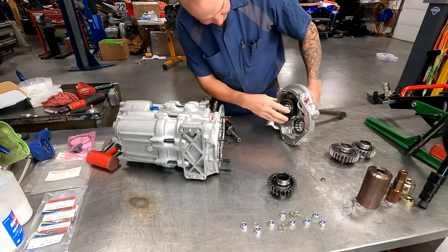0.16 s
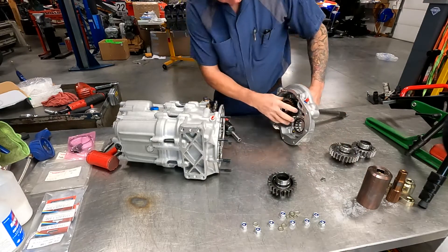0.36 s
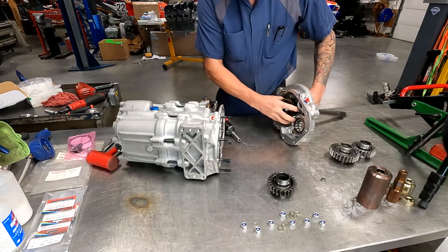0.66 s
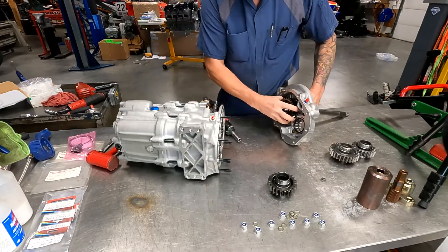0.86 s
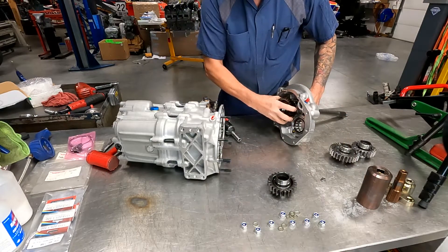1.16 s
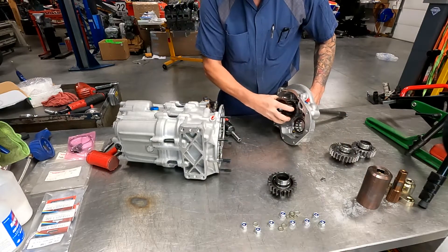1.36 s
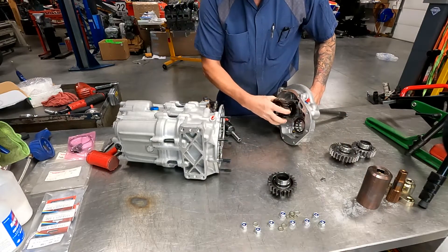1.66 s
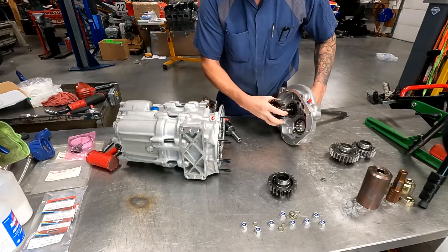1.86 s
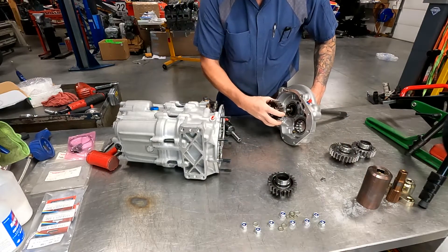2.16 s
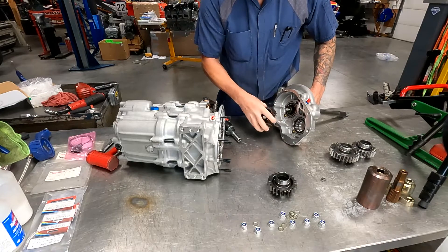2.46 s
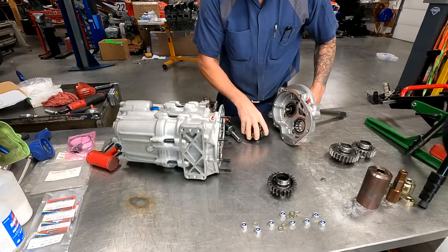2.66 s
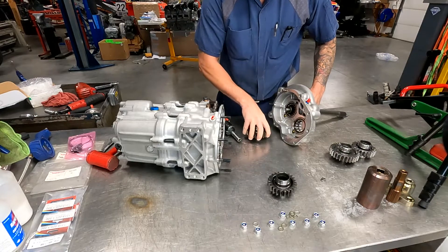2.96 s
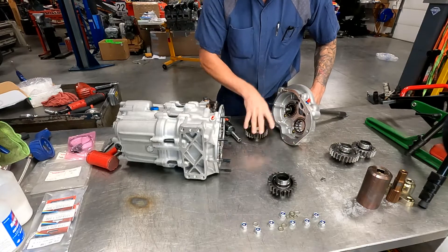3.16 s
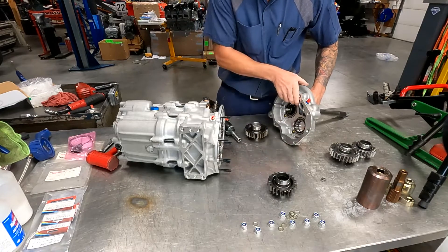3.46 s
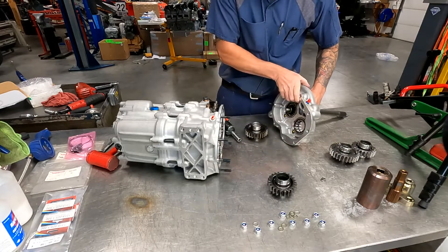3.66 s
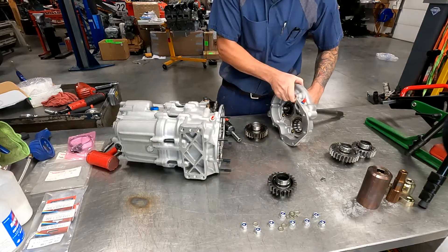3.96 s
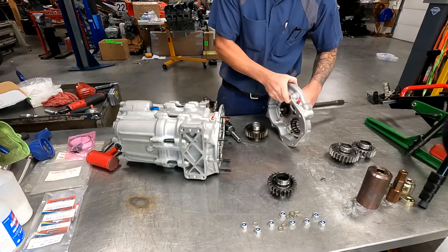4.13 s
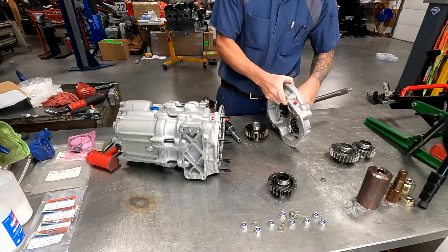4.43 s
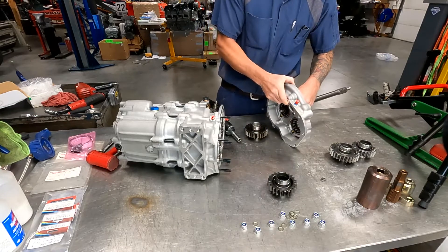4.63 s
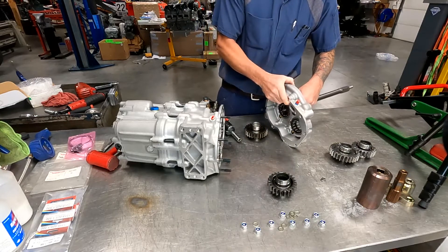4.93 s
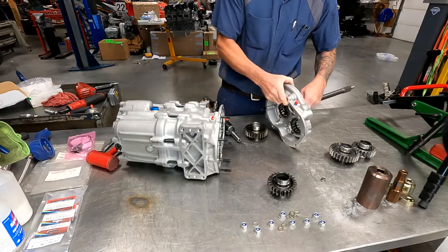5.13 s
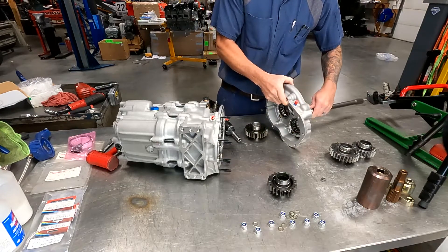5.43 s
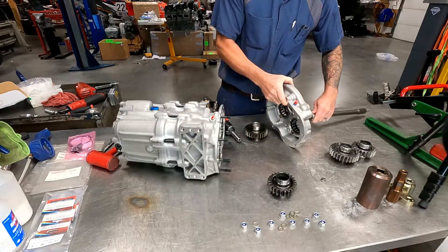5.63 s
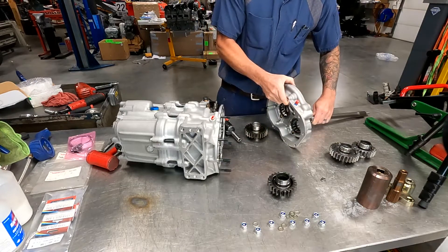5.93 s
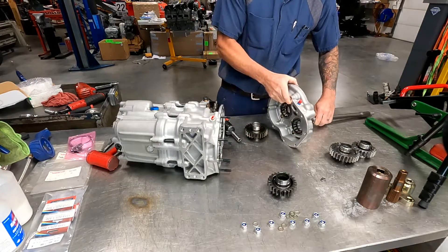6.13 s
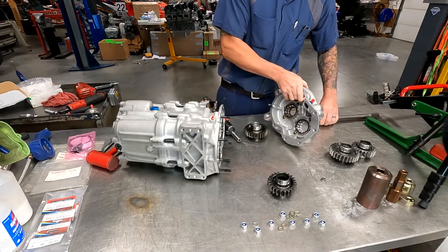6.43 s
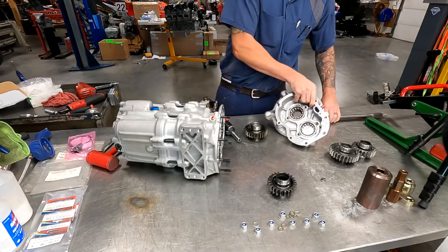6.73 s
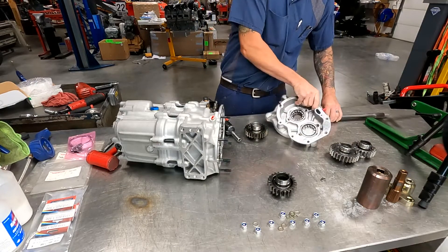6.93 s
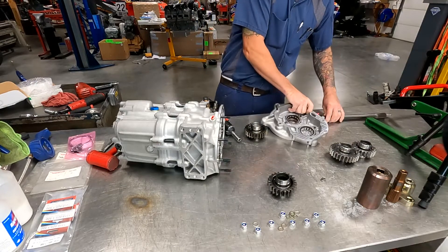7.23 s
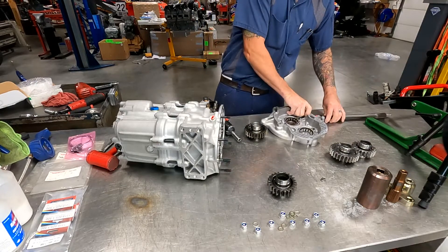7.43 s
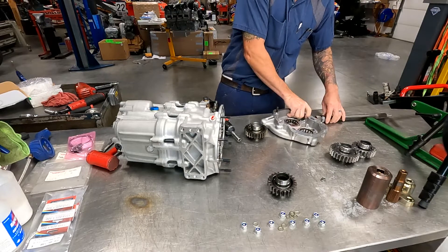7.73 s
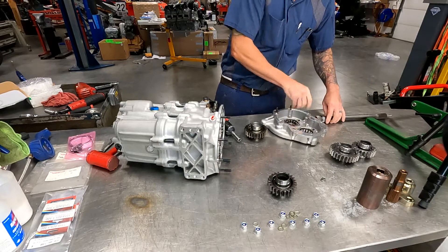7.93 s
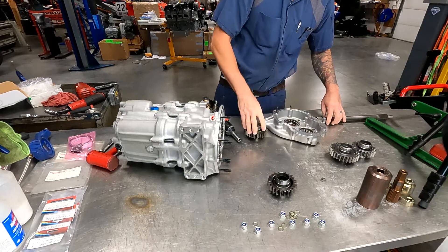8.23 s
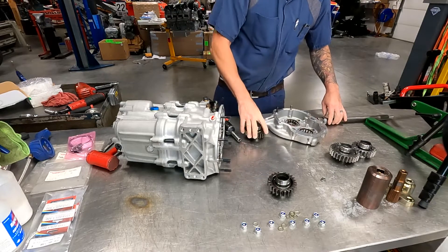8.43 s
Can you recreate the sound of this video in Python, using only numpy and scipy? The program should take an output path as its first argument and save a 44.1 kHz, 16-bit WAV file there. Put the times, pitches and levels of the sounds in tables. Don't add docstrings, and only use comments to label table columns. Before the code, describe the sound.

Quiet garage with low hum, floor rumble and faint hiss, heard close to a sheet steel bench and nearly mono. A soft low knock opens at 0 s, a tiny click at 0.7, then faint dry rubbing of a gear turned in its seat until about 2.4. At 2.8 the gear lands with a loud, bright clank and deep bench thud, falling flat at 3.08. Muted knocks and a short rub follow around 4.0, 4.4 and 4.9, with a tiny squeak near 4.8. At 5.93 the heavy housing knocks hard; a gritty drag grows from 6.1 to a double bang at 6.55. It clatters over at 6.84-6.96, scrapes, knocks at 7.57 and lands loudly at 7.8. A thin high shaft tone rings after 6.87 and from 7.6 almost to the end, over dull rocking, soft ticks and a last low knock at 8.52.

```python
import sys
import numpy as np
from scipy import signal
from scipy.io import wavfile
from scipy.ndimage import uniform_filter1d

SR = 44100
rng = np.random.default_rng(int(sys.argv[2]) if len(sys.argv) > 2 else 0)


def store_wav(level_fs):
    pcm = np.round(np.clip(np.atleast_2d(level_fs), -1, 1) * 32767)
    wavfile.write(sys.argv[1], SR, pcm.T.astype(np.int16))


def convert_level_to_amplitude(level_db):
    exponent = np.asarray(level_db, float) / 20
    return 10 ** exponent


N = 378819
TIME = np.arange(N) / SR
EDGES = 45 * 2 ** (np.arange(27) / 3)
CENTRES = np.sqrt(EDGES[1:] * EDGES[:-1])

# f/Hz, level/dB per Hz
AIR = [(24, -31), (40, -4), (140, -15.5), (195, -21), (244, -20.5), (284, -29), (356, -24), (403, -28),
       (481, -26), (650, -29.5), (2170, -34.5), (3870, -32.5), (6240, -39.5), (15000, -42), (16200, -53.5)]
AIR_DB = -68
# f/Hz, level/dB
HUM = [(120, -81.5), (240, -76), (360, -82)]
# t/s, level/dB
SWAY = [(0, -46), (0.5, -44), (1.1, -40.5), (1.6, -54.5), (2.0, -43), (3.2, -52.5), (4.1, -49), (5.3, -49),
        (6.25, -60), (7.1, -47.5), (8.59, -56)]
# t/s, level/dB
SHAKES = [(0.05, -54), (1.75, -59), (2.87, -48), (3.25, -57.5), (3.9, -55), (4.2, -55), (4.62, -55),
          (5.001, -56), (6.031, -49.5), (6.27, -55.5), (6.6, -40.5), (6.89, -41), (7.12, -50), (7.4, -58),
          (7.61, -50), (7.87, -37), (8.15, -48), (8.45, -46.5)]
FLOOR_DB, SHAKE_RISE_S, SHAKE_FALL_S = -62.5, 0.11, 0.19
# f/Hz, level/dB per Hz
SIDE_HISS = [(120, -58), (200, -29), (254, -3.5), (353, 0.5), (482, -2), (11300, -4), (13300, -12),
             (16000, -11.5)]
SIDE_DB = -87
SIDE_SLOPE_DB = -31

# f/Hz, level/dB, t60/s
BENCH = [(105.4, -8, 0.5), (150, -6.5, .4), (200.9, -8, .4), (253, -19.5, 0.35), (311.4, -11, 0.249),
         (478, -21, 0.17), (546, -11.5, 0.18), (584, -10.5, 0.085), (651.5, -30, .2)]
# f/Hz, level/dB, t60/s
GEAR = [(1027, -2, 0.23), (1474, -8.5, 0.43), (2028, -3.5, 0.2), (2410, -4.5, 0.22), (2987, -2.5, 0.22),
        (3170, -4, 0.31), (3580, 5, 0.41), (3810, -3.5, 0.37), (4600, -6.5, 0.28), (4880, -7, 0.18),
        (4740, -13.5, 0.71), (5250, -10.5, 0.28), (6300, -12, 0.21), (6172, -9, 0.22), (6590, -10, 0.15),
        (6600, -10.5, 0.18), (6780, -17.5, 0.21), (7200, -14.5, 0.2), (7400, -16.5, 0.19),
        (7757, -10.5, 0.16)]
# f/Hz, level/dB, t60/s
HOUSING = [(334, 4, 0.65), (408, 1, 1.0), (589, 6, 0.76), (1050, 6, 5.0), (1237, 2, 0.42), (1630, -4, 0.48),
           (1890, -35, 5.0), (2040, -17, 5.0), (2405, 4.5, 0.13), (3550, 9, 0.2), (3910, 2.5, 0.22),
           (4030, -3, 0.035), (3850, -12, 0.061), (4800, -24, 5.0), (5717, -22, 0.72), (6270, 4, 0.025)]
GEAR_UNTIL_S = 3.5

# t/s, 1-4 kHz peak level/dB, weight/dB, edge/dB (both relative), sheet t60/s
KNOCKS = [(0.0014, -58, 13, -18, 0.34), (0.6806, -68, -6, -4, 0.16), (2.802, -14, -8, -10, 0.31),
          (3.05, -41.5, -7, -15, 0.12), (3.0778, -24.5, -1, -14.5, 0.37), (3.979, -43.5, -23, -22, 0.34),
          (4.0583, -41, 5.5, -25.5, 0.37), (4.3806, -35.5, 3, -25.5, 0.37), (4.8891, -60.5, 16, -17, 0.66),
          (5.9319, -21, -9, -16.5, 0.38), (6.5493, -22.5, -8.5, -15, 0.17), (6.5775, -27, -3, -22, 0.33),
          (6.8356, -20, -7.5, -21.5, 0.3), (7.5559, -29.5, -3, -54, 0.12),
          (7.7982, -22.5, -5.5, -14.5, 0.48), (8.52, -37.5, 8.5, -21.5, 0.21)]
# t/s, peak level/dB, weight/dB, sheet t60/s
BOUNCES = [(6.8476, -32, -6, 0.14), (6.891, -24.5, -10, 0.27), (6.9558, -24, -12, 0.36),
           (7.1147, -43, -10, 0.15), (7.18, -58, 3, 0.38), (7.5772, -25, -11, 0.2), (7.6031, -33, -3, 0.5),
           (7.829, -20, -17, 0.26), (7.8385, -18, -15.5, 0.26), (7.857, -24, -4.5, 0.2),
           (7.91, -38, -13, 0.19)]
BOUNCE_EDGE_DB = -19.5
# t/s, peak level/dB
TICKS = [
    (8.064, -43),
    (8.1166, -43),
    (8.15, -46),
    (8.2217, -41),
    (8.2734, -44.5),
    (8.382, -47),
    (8.429, -46),
]
TICK_WEIGHT_DB, TICK_EDGE_DB, TICK_T60_S = -0.5, -28, 0.29
HITS = sorted([*KNOCKS,
               *[(s, db, weight, BOUNCE_EDGE_DB, t60) for s, db, weight, t60 in BOUNCES],
               *[(s, db, TICK_WEIGHT_DB, TICK_EDGE_DB, TICK_T60_S) for s, db in TICKS]])
COLOUR_HZ = np.log([130, 450, 2000, 9000])
KNOCK_DB, KNOCK_PER_WEIGHT = -5.0, 0.54

# t/s, peak level/dB, f/Hz, t60/s
SINGLE_MODES = [(2.8, -32, 92.6, 0.36), (2.801, -12, 139, 0.075), (3.077, -21.5, 194.5, 0.27),
                (4.057, -42, 178, 0.51), (4.378, -35.5, 186, 0.37), (5.931, -26, 151, 0.34),
                (6.551, -32.5, 182.5, 0.34), (6.575, -33, 152, 0.42), (6.835, -31, 177, 0.65),
                (6.895, -32, 179.5, 0.25), (6.956, -33, 257.6, 0.33), (7.577, -38, 181, 0.19),
                (7.793, -23.5, 129, 0.11), (7.842, -25, 149.4, 0.3), (7.869, -39, 163, 0.16),
                (8.521, -30.5, 185.5, 0.2),
                (0.001, -39, 322, 0.2), (0.681, -58, 4250, 0.034), (0.681, -56, 5150, 0.032),
          (1.271, -65, 1960, 0.37), (1.09, -66, 1774, 0.6), (8.429, -54, 1290, 0.4),
          (2.802, -20.5, 519, 0.13), (2.803, -23.5, 199.3, 0.36), (3.048, -47, 1050, 0.1),
          (3.08, -30.5, 391, 0.17), (3.085, -41, 3650, 0.29), (3.101, -33.5, 208.2, 0.74),
          (4.89, -46, 191.2, 0.4), (8.069, -44.5, 305.5, 0.43), (8.07, -51, 1265, 0.1),
          (8.276, -51, 1300, 0.12), (8.526, -43, 150, .1), (7.601, -53, 1610, 0.2), (4.39, -43, 160, 0.77),
          (5.94, -37, 150, 0.79), (6.837, -28, 806, 0.074), (6.96, -42.5, 154.7, 1.1),
          (7.556, -26.5, 1274, 0.031), (7.83, -24, 302.5, 0.23), (7.83, -31.5, 1284, 0.18),
          (7.83, -37, 3840, 0.26), (8.555, -53, 2000, 0.24), (8.543, -55, 3900, .2),
          (8.516, -62, 13300, .03), (8.524, -63, 13700, .03), (8.543, -63, 10500, .03),
          (8.553, -62, 11000, .03), (8.56, -64, 10300, .04), (8.545, -66, 14000, .03),
          (8.454, -63, 14300, .02), (7.64, -63, 8300, .25), (4.815, -70, 3150, .1), (3.96, -60, 2060, .2),
          (3.97, -60, 3880, .2), (3.079, -36, 150, .4), (7.802, -36, 3800, .15), (6.838, -34, 640, .15),
          (6.55, -36, 1560, .08), (6.585, -42, 500, .3), (6.1, -50, 150, .4), (7.792, -40, 1200, .03),
          (7.577, -40, 2100, .06), (7.15, -52, 290, .3), (2.29, -62, 185, .3)]
# f/Hz, level/dB, t60/s
GEAR_DOWN = [(600, -6, .25), (1028, -13, .22), (1780, -9, .25), (1954, -12, .28), (2110, -13, .23),
             (2390, -14, .24), (2912, -11, .3), (3138, -9, .3), (3262, -9, .28), (3688, -11, .4),
             (4457, -15, .26), (4662, -11, .24), (5313, -8, .07), (6040, -15, .2)]
# f/Hz, level/dB, t60/s
GEAR_FLAT = [(468, -10, 1.1), (598, -1, 0.22), (1163, -12, 0.27), (1211, -10, 0.24), (1680, -12, 0.31),
             (1868, -6, 0.17), (3542, 0, 0.12), (3628, -14, 0.34), (3688, -10, 0.26), (3898, -7, 0.21),
             (4037, -14, 0.28), (4387, -14, 0.18)]
# f/Hz, level/dB, t60/s
HOUSING_TIPS = [(479, -2, 0.62), (1330, -2, 0.32), (1846, -5, 0.33), (2250, -12, 0.45), (3160, -7, 0.35),
                (3488, -6, 0.28), (3790, -3, 0.22), (3865, 0, 0.17), (4888, -10, 0.25), (6595, -22, 0.5)]
# f/Hz, level/dB, t60/s
HOUSING_STOPS = [(1739, -7, 0.33), (2487, -5, 0.19), (2929, -4, 0.2), (3300, -6, 0.25), (3391, 0, 0.19),
                 (4097, -3, 0.2), (4613, -26, 5.0), (5050, -5, 0.14), (5319, -10, 0.24), (5534, -27, 1.7)]
# f/Hz, level/dB, t60/s
HOUSING_TURNS = [(824, -3, .2), (1217, -8, .2), (1776, -2, .3), (2283, -6, .2), (2751, -9, .2),
                 (3268, 0, .25), (3542, -4, .2), (3849, -6, .3), (4064, -6, .2)]
# f/Hz, level/dB, t60/s
HOUSING_LIES = [(1884, 0, .3), (2342, -5, .35), (2805, -5, .3), (3262, -3, .3), (3596, -3, .3),
                (6175, -14, .4), (7364, -14, .3)]
# t/s, peak level/dB of the strongest mode, family of modes
LANDINGS = [
    (2.802, -23, GEAR_DOWN),
    (3.079, -38, GEAR_FLAT),
    (5.933, -42, HOUSING_TIPS),
    (6.55, -42, HOUSING_STOPS),
    (6.837, -42, HOUSING_TURNS),
    (6.892, -44, HOUSING_TURNS),
    (6.957, -44, HOUSING_TURNS),
    (7.8, -42, HOUSING_LIES),
    (7.839, -38, HOUSING_LIES),
]
LONGEST_RING_S = .45

# f/Hz, level/dB per Hz
SHEET = [(29, -38), (55, -10), (198, -5.5), (313, -9.5), (380, -11.5), (586, -13), (927, -18.5),
         (1050, -18.5), (1960, -18.5), (2750, -21), (3760, -16.5), (10400, -32), (16000, -44.5)]
# f/Hz, factor on t60
SHEET_T60 = [(60, 1.26), (200, 1.22), (600, 1.055), (2000, 1), (6000, 0.67), (14000, 0.7)]
# f/Hz, level/dB
CRACK = [(1000, 2), (5000, -63), (10000, 12), (16000, 11)]
# f/Hz, level/dB under the blow, t60/s
GARAGE = [(60, -24, 2.87), (396, -19, 0.61), (3240, -17, 0.8), (11730, -18.5, 0.64)]

# peak t/s, rise/s, fall/s, friction level/dB, dull level/dB relative to it
TURNS = [(0.95, .1, 0.39, -69.5, 4), (1.535, .03, .14, -69, -25), (2.0, 0.16, 0.13, -65, -1),
         (2.19, 0.064, 0.12, -68, -7), (2.285, 0.094, 0.13, -65, 2.5), (2.44, .03, .08, -74, -20),
         (1.91, .03, .08, -71, -5), (3.905, 0.055, .12, -62.5, 5), (3.975, 0.086, 0.072, -53, -12),
         (4.83, .09, .09, -79, -8), (4.905, 0.054, .1, -68.5, 5)]
NUDGES = [
    (1.13, 0.091, 0.083, -61, 1),
    (1.31, 0.089, .06, -68.5, 13),
    (5.755, .02, .12, -75, -17),
]
SLIDES = [
    (6.13, 0.089, 0.39, -50, -5),
    (6.28, 0.26, 0.17, -48, -4),
    (6.46, 0.092, 0.085, -44, -7),
    (6.53, 0.12, 0.033, -47.5, -7),
    (7.04, .05, 0.19, -53, 2),
    (7.2, .15, 0.32, -63.5, -2),
    (7.796, .005, .02, -42, -2),
]
ROCKS = [
    (7.99, .04, 0.13, -58, 4.8),
    (8.15, .008, 0.11, -53.5, 5),
    (8.32, .2, .2, -63.5, 9.4),
    (8.458, 0.0073, .08, -55, 2.8),
    (8.55, .05, .2, -54, 12.3),
]
TURN_BRIGHT_DB, NUDGE_BRIGHT_DB, SLIDE_BRIGHT_DB, ROCK_BRIGHT_DB = -12, -39, -11, -17
STROKE_FADE_DB = 16.5
# f/Hz, level/dB per Hz
RUB = [(59, -33), (100, -7.5), (215, -7.5), (315, -5), (415, -5), (502, -4), (1360, -8), (3320, -12),
       (14400, -23.5), (16000, -32)]
# f/Hz, width/Hz, level/dB
FINGERED = [(1100, 11, -2), (1597, 17, -6), (1900, 120, -6), (2980, 25.4, -15), (3500, 23, -2),
            (3806, 110, -0.5), (4390, 41, -8.5), (4560, 52, -29), (4720, 67, -12), (5150, 27, -18),
            (5900, 200, -5), (7600, 33, -28.5)]
# f/Hz, width/Hz, level/dB
RUBBED = [(500, 14, 2), (1050, 50, -2), (2170, 150, -10), (2550, 42, -8), (3020, 57, -12), (3470, 29, -4.5),
          (3880, 22, -3), (4620, 31, -13), (5430, 60, -13), (6100, 43, -15), (9850, 60, -17),
          (12300, 150, -15), (10900, 140, -14), (14500, 55, -18)]
SEAT_UNTIL_S, DRAG_UNTIL_S = 5.95, 6.6

# t/s, peak level/dB
SNAPS = [(2.802, -19), (3.0779, -32), (5.932, -28), (5.961, -46), (6.3326, -54), (6.4049, -54), (6.55, -38),
         (6.8444, -34), (6.892, -42), (6.9566, -48), (7.1094, -53), (7.1841, -58), (7.5772, -46),
         (7.615, -48), (7.7922, -40), (7.8, -36), (7.8385, -32), (8.1449, -59), (8.2102, -57),
         (8.4532, -56), (8.5435, -60)]
SNAP_DB, SNAP_T60_S, SNAP_FROM_HZ = -4.5, .03, 7000

# t/s, level/dB
SQUEAK = [
    [(4.79, -79), (4.82, -72), (4.865, -79)],
]
SQUEAK_HZ = 3790
# from t/s, until t/s, level/dB, t60/s
SHAFT = [
    (6.868, 6.958, -39, .38),
    (6.988, 7.022, -50, 0.4),
    (7.035, 7.052, -59, .4),
    (7.072, 7.11, -58, .4),
    (7.125, 7.47, -67, 1.2),
    (7.601, 7.795, -41, 1.05),
    (7.945, 8.53, -48.5, 1.7),
    (8.578, 8.62, -60, 1.5),
]
SHAFT_HZ = 4830


def rms_one(x):
    return x / np.sqrt(np.mean(x ** 2) + 1e-20)


def band_pass(x, edges, order):
    return signal.sosfilt(signal.butter(order, edges, "band", fs=SR, output="sos"), x)


def at_hz(points, hz, axis=1):
    points = np.array(points)
    return np.interp(np.log(hz), np.log(points[:, 0]), points[:, axis])


def bands():
    white = rng.standard_normal((2, N))
    return [band_pass(white[k % 2], EDGES[k:k + 2], 2) for k in range(len(CENTRES))]


def coloured(spectrum):
    return rms_one(sum(convert_level_to_amplitude(at_hz(spectrum, hz)) * band for hz, band in zip(CENTRES, bands())))


def fine(coarse):
    return np.interp(TIME, TIME[::64], coarse)


def swell(peak_s, rise, fall, level_db):
    late = TIME[::64] - np.asarray(peak_s)[:, None]
    span = np.where(late < 0, np.reshape(rise, (-1, 1)), np.reshape(fall, (-1, 1)))
    fade_db = np.minimum(STROKE_FADE_DB * (late / span) ** 2, 90)
    return convert_level_to_amplitude(np.asarray(level_db)[:, None] - fade_db) ** 2


def garage_air():
    s, shake_db = np.transpose(SHAKES)
    shake_power = swell(s, SHAKE_RISE_S, SHAKE_FALL_S, shake_db).sum(axis=0)
    shake_gain = fine(np.sqrt(shake_power + convert_level_to_amplitude(FLOOR_DB) ** 2))
    sway_gain = convert_level_to_amplitude(np.interp(TIME, *np.transpose(SWAY)))
    sway = rms_one(band_pass(rng.standard_normal(N + SR), [.7, 7], 4)[SR:])
    rumble = rms_one(band_pass(rng.standard_normal(N + SR), [20, 48], 4)[SR:])
    hum = sum(convert_level_to_amplitude(level_db) * np.sin(2 * np.pi * hz * TIME) for hz, level_db in HUM)
    return sway_gain * sway + shake_gain * rumble + hum + convert_level_to_amplitude(AIR_DB + 2.5) * coloured(AIR)


def thuds():
    out, after = np.zeros(N + SR), np.arange(SR) / SR
    woken = [(s, db + mode_db, hz, min(t60, LONGEST_RING_S))
             for s, db, family in LANDINGS for hz, mode_db, t60 in family]
    for s, level_db, hz, t60 in [*SINGLE_MODES, *woken]:
        late = after[:int(min(1.6 * t60, 1) * SR)]
        swing = convert_level_to_amplitude(level_db - 1 - 60 * late / t60) * (1 - np.exp(-late * hz * 2.7))
        out[int(s * SR):][:len(late)] += swing * np.sin(2 * np.pi * hz * late)
    return out[:N]


def ring(clicks, hz, t60):
    r, w = convert_level_to_amplitude(-60 / (t60 * SR)), 2 * np.pi * hz / SR
    return signal.lfilter([0, np.sin(w)], [1, -2 * r * np.cos(w), r * r], clicks + 1e-18)


def blow_db(hz):
    s, peak, thud, edge, _ = np.transpose(HITS)
    knock = KNOCK_DB + KNOCK_PER_WEIGHT * thud
    colour = np.array([np.interp(np.log(hz), COLOUR_HZ, c) for c in zip(thud, knock, 0 * s, edge)])
    return peak + colour - np.interp(np.log(hz), COLOUR_HZ, [-6, -9, 0, -12])


def struck(modes, level_db, longest, chosen):
    at, out = (np.array(HITS)[:, 0] * SR).astype(int), np.zeros(N)
    luck = np.clip(rng.normal(0, 1, (len(at), len(modes))), -1.2, 1.2)
    for k, (hz, mode_db, t60) in enumerate(modes):
        clicks = np.zeros(N)
        clicks[at] = chosen * convert_level_to_amplitude(blow_db(hz) + mode_db + level_db) * luck[:, k]
        out += ring(clicks, hz, min(t60, longest))
    return out


def blows():
    gear = (np.array(HITS)[:, 0] < GEAR_UNTIL_S) * 1.
    bench_ring = struck(BENCH, -5.5, 0.86, 0.6)
    return bench_ring + struck(GEAR, -21, 0.22, gear) + struck(HOUSING, -24, 0.12, 1 - gear)


def sheet():
    out, after = np.zeros(N), np.arange(0, int(1.2 * SR), 8) / SR
    for hz, band in zip(CENTRES, bands()):
        energy = np.zeros(N // 8 + 1 + len(after))
        rise = 1 - np.exp(-after / (0.00092 + 0.84 / hz))
        echo_db = at_hz(GARAGE, hz) - 60 * after / at_hz(GARAGE, hz, axis=2)
        echo = convert_level_to_amplitude(echo_db) ** 2 * (1 - np.exp(-after / .015))
        crack = convert_level_to_amplitude(at_hz(CRACK, hz) - 60 * after / 0.03) ** 2
        for (s, *_, t60), level_db in zip(HITS, blow_db(hz)):
            dying = convert_level_to_amplitude(-60 * after / (max(t60, .02) * at_hz(SHEET_T60, hz))) ** 2
            blow = convert_level_to_amplitude(level_db) ** 2 * (rise * (dying + crack) + echo)
            energy[int(s * SR) // 8:][:len(after)] += blow
        out += convert_level_to_amplitude(at_hz(SHEET, hz) + 16.5) * band * np.repeat(np.sqrt(energy), 8)[:N]
    return out


def drift(rate):
    return np.interp(TIME[::64] * rate, np.arange(600), rng.standard_normal(600))


def strokes():
    kinds = ((TURNS, TURN_BRIGHT_DB), (NUDGES, NUDGE_BRIGHT_DB),
             (SLIDES, SLIDE_BRIGHT_DB), (ROCKS, ROCK_BRIGHT_DB))
    rows = [(*row, bright_db) for table, bright_db in kinds for row in table]
    s, rise, fall, level_db, dull, bright = np.transpose(rows)
    power = swell(s, rise, fall, level_db)
    total = power.sum(axis=0)
    return 10 * np.log10(total), dull @ power / total, bright @ power / total


def drags():
    friction_db, dull_db, bright_db = strokes()
    slip_size = convert_level_to_amplitude(3.64 * np.minimum(rng.exponential(1, N), 4))
    slips = (rng.random(N) < 3500 / SR) * slip_size * rng.choice([-1, 1], N)
    grit = uniform_filter1d(np.abs(slips), size=120)
    grit = 0.7 + 0.3 * grit / grit.mean()
    judder_db = 1.5 * drift(45)

    def gain(hz, extra_db):
        dull, bright = np.clip([np.log2(1400 / hz), np.log2(hz / 4200)], 0, 1)
        colour_db = dull * (dull_db + 3.5) + bright * (bright_db + 5.0)
        return fine(convert_level_to_amplitude(friction_db + judder_db + colour_db + extra_db))

    def rung(peaks, level_db, slide, span):
        out = 0
        for hz, width, top_db in peaks:
            pitch = hz * fine(1 + slide * drift(14))[span]
            turn = np.exp(2j * np.pi * np.cumsum(pitch) / SR)
            decay = np.exp(-np.pi * max(width, .03 * hz) / SR)
            shaken = signal.lfilter([1], [1, -decay], slips[span] / turn)
            loudness = gain(hz, top_db + level_db + 4.0 * drift(24))[span]
            out = out + loudness * rms_one((shaken * turn).real)
        return out

    hiss = 0
    for hz, band in zip(CENTRES, bands()):
        flutter_db = 3.0 * drift(28) + 1.8 * drift(10)
        hiss = hiss + gain(hz, at_hz(RUB, hz) + 13 + flutter_db) * band
    cut = int(SEAT_UNTIL_S * SR)
    gear_rings = rung(FINGERED, -11.0, .012, slice(0, cut))
    housing_rings = rung(RUBBED, -9.5, .05, slice(cut, N))
    rings = np.concatenate([gear_rings, housing_rings])
    return grit * hiss + rings * np.where(TIME < DRAG_UNTIL_S, 1, .35)


def snaps():
    s, db = np.transpose(SNAPS)
    clicks = np.zeros(N)
    clicks[(s * SR).astype(int)] = convert_level_to_amplitude(db + SNAP_DB)
    dying = signal.lfilter([1], [1, -convert_level_to_amplitude(-60 / (SNAP_T60_S * SR))], clicks + 1e-18)
    treble = signal.butter(2, SNAP_FROM_HZ, "high", fs=SR, output="sos")
    return signal.sosfilt(treble, dying * rng.standard_normal(N))


def joined(tables):
    rows = []
    for table in tables:
        (first_s, first_db), (last_s, last_db) = table[0], table[-1]
        rows += [(first_s - .012, -110), *table, (last_s + .012, -110)]
    return np.interp(TIME, *np.transpose(rows))


def tones():
    shaft = [[(s, db), (end, db - 60 * (end - s) / t60)] for s, end, db, t60 in SHAFT]
    out = 0
    for rows, hz in ((SQUEAK, SQUEAK_HZ), (shaft, SHAFT_HZ)):
        out = out + np.sqrt(2) * convert_level_to_amplitude(joined(rows)) * np.sin(2 * np.pi * hz * TIME)
    return out


def scene():
    mid = garage_air() + thuds() + blows() + sheet() + drags() + tones()
    slope = np.gradient(mid - 1.5 * np.gradient(np.gradient(mid)))
    side = convert_level_to_amplitude(SIDE_SLOPE_DB) * slope + convert_level_to_amplitude(SIDE_DB) * coloured(SIDE_HISS)
    mid = mid + snaps()
    return mid + side * np.array([[1], [-1]])


def low_pass(x):
    return signal.sosfilt(signal.butter(12, 16810, fs=SR, output="sos"), x)


def record(dry):
    mix = signal.sosfilt(signal.cheby2(10, 60, 17000, fs=SR, output="sos"), dry)
    return low_pass(mix)


dry = scene()
out = record(dry)
store_wav(out)
```